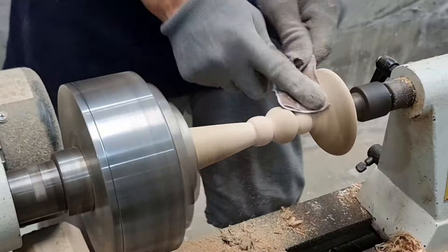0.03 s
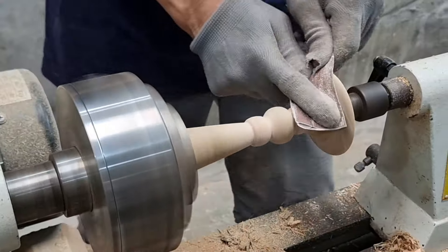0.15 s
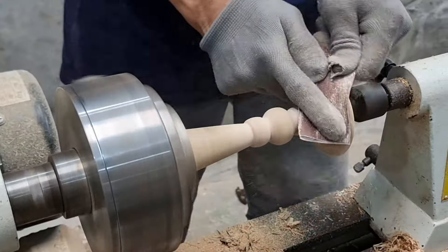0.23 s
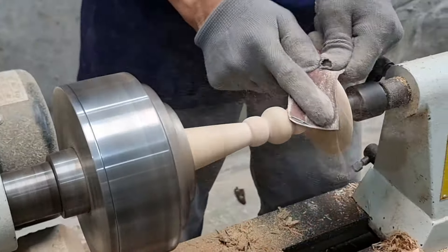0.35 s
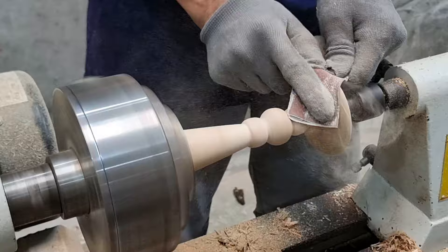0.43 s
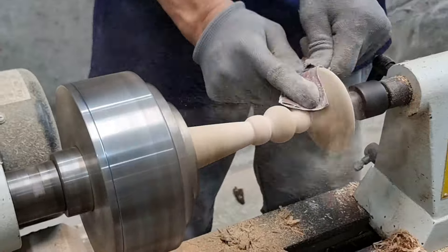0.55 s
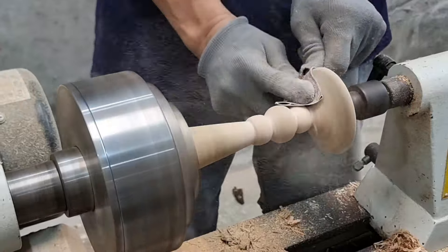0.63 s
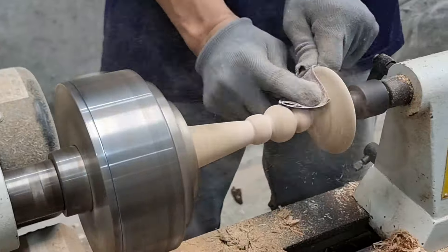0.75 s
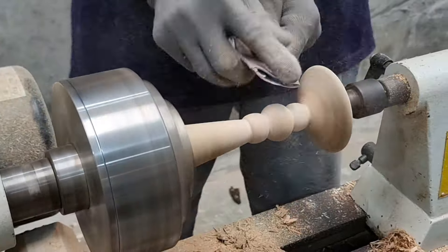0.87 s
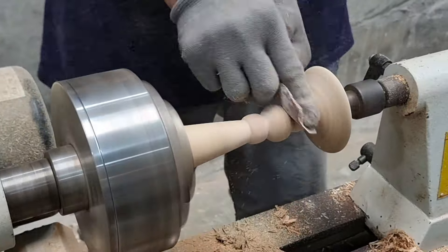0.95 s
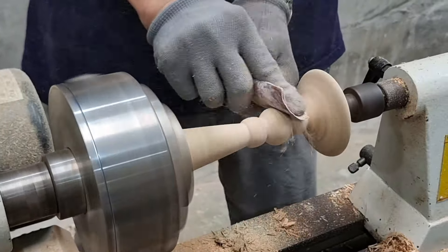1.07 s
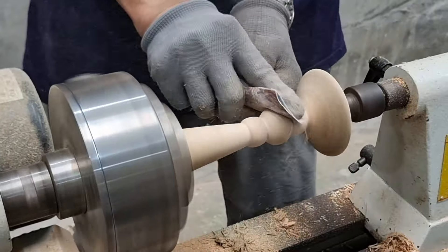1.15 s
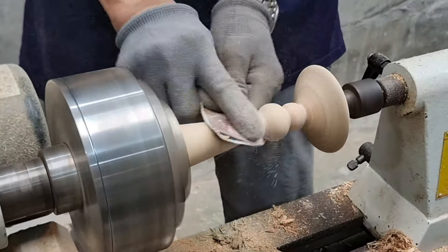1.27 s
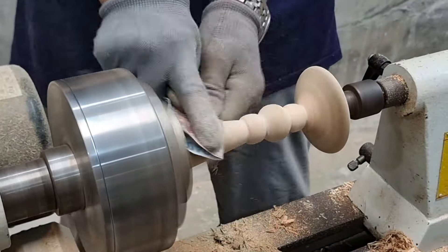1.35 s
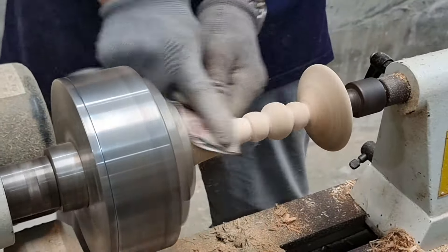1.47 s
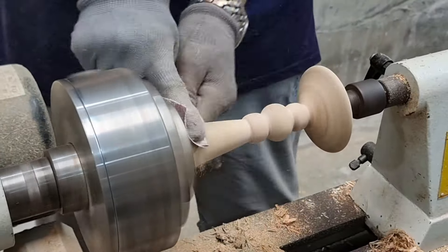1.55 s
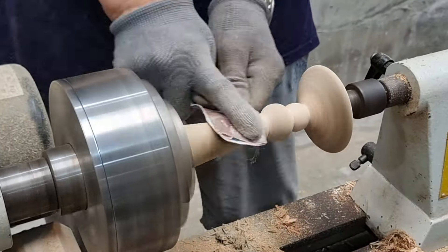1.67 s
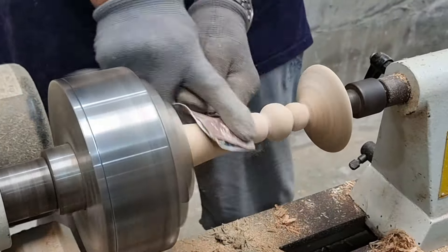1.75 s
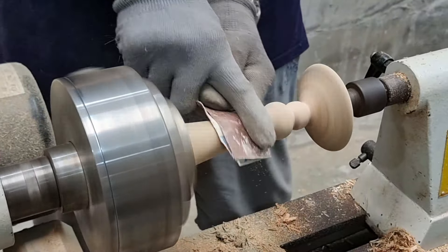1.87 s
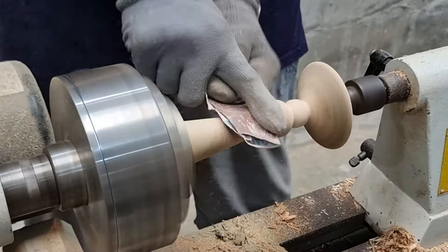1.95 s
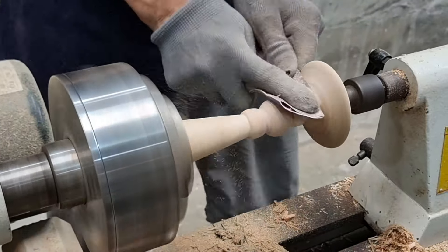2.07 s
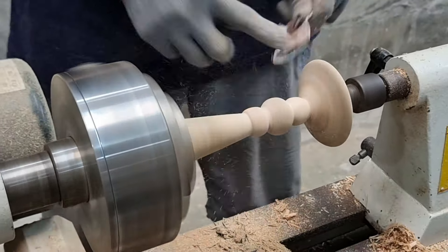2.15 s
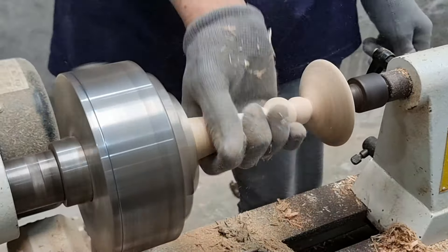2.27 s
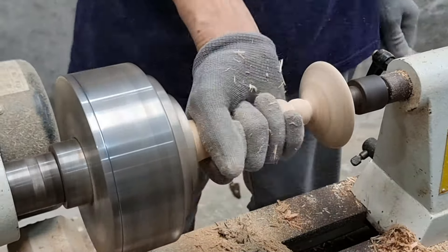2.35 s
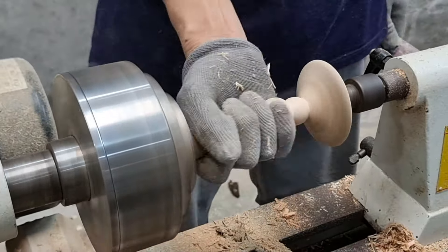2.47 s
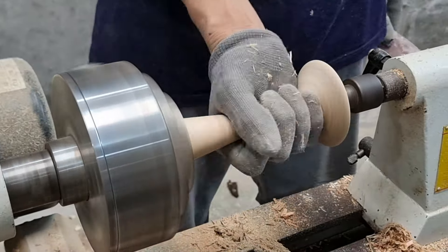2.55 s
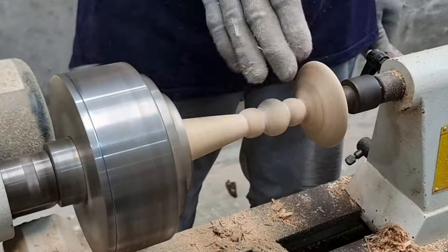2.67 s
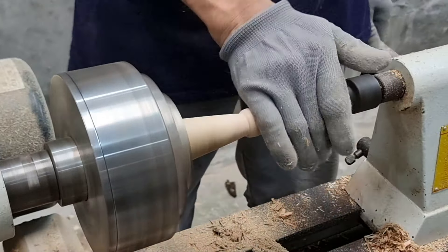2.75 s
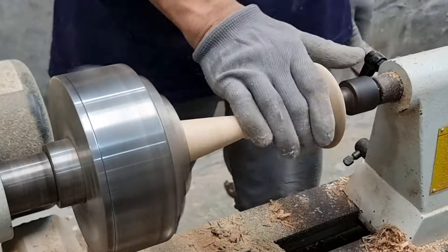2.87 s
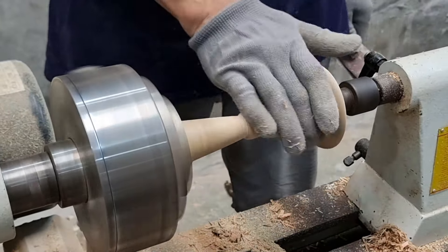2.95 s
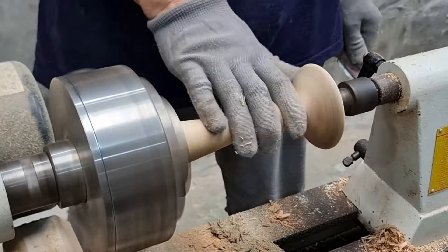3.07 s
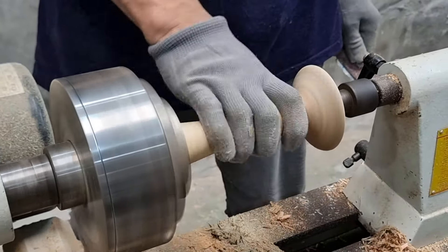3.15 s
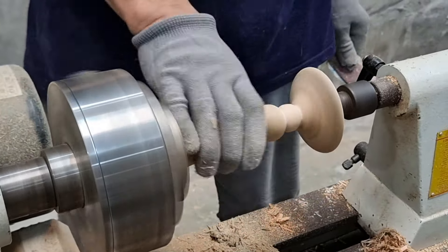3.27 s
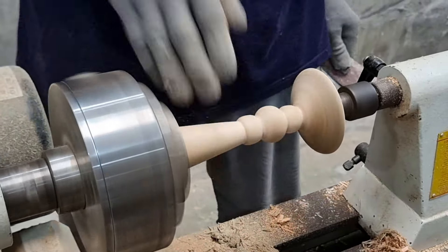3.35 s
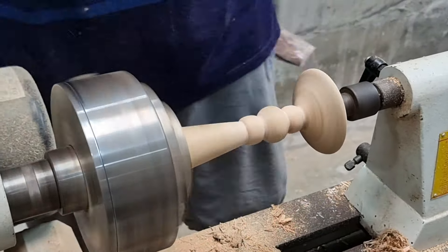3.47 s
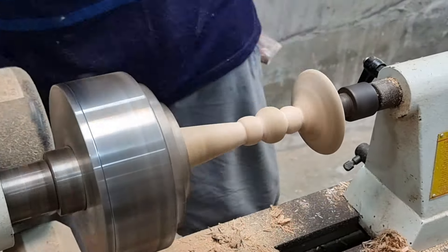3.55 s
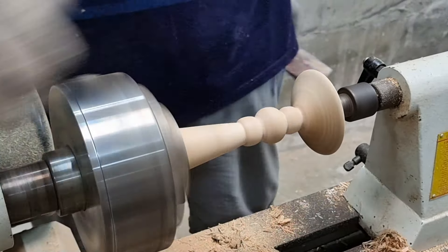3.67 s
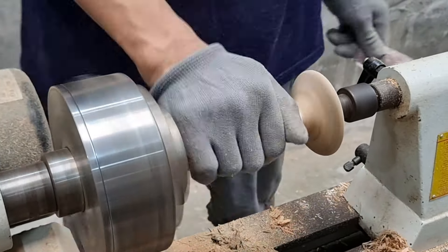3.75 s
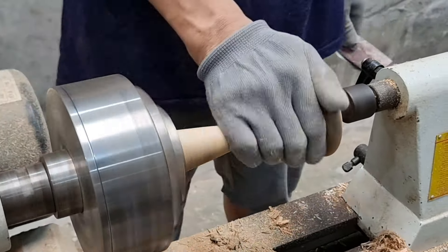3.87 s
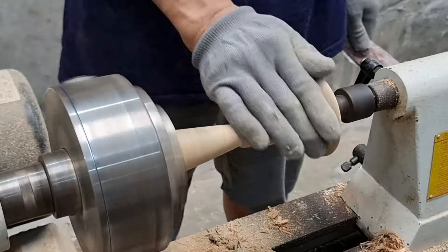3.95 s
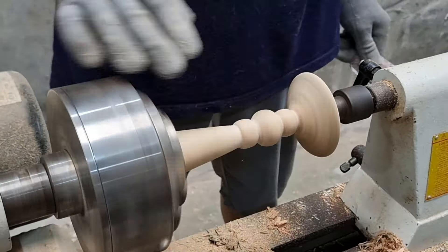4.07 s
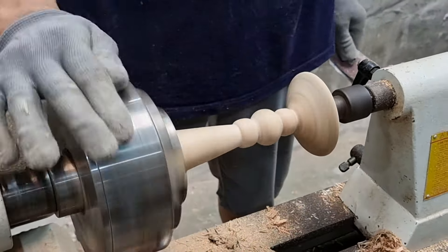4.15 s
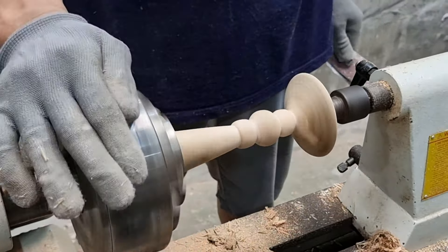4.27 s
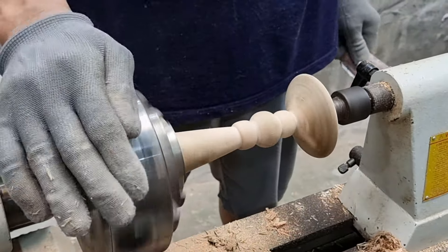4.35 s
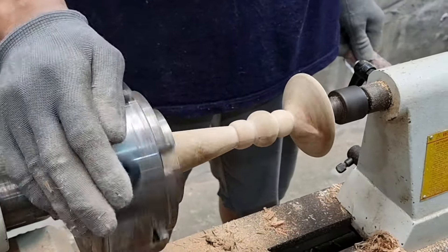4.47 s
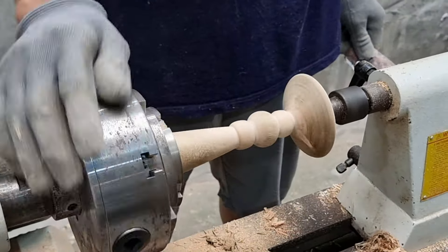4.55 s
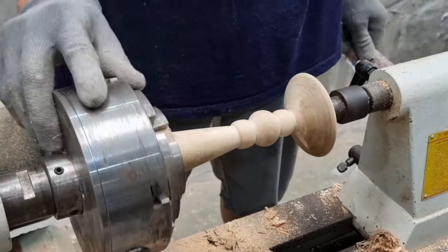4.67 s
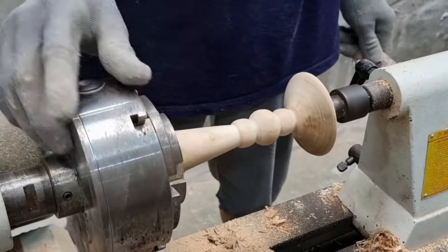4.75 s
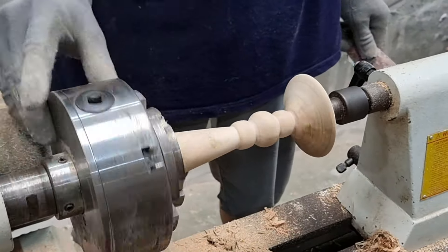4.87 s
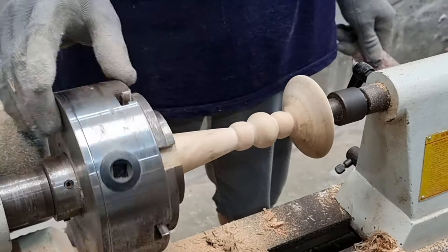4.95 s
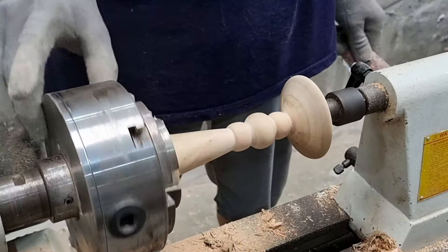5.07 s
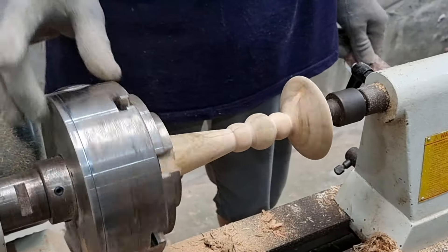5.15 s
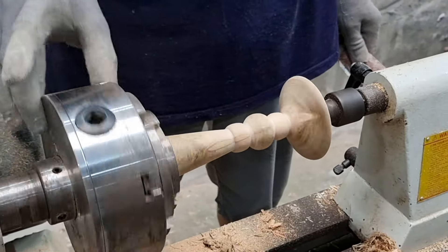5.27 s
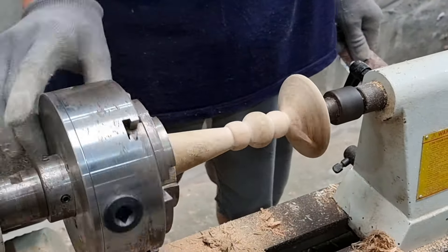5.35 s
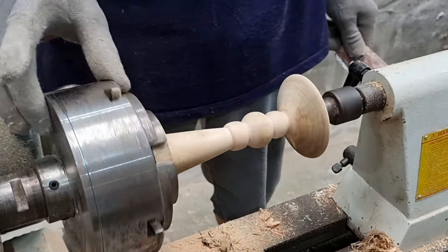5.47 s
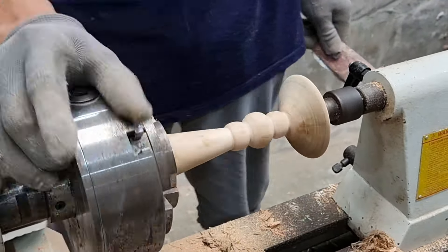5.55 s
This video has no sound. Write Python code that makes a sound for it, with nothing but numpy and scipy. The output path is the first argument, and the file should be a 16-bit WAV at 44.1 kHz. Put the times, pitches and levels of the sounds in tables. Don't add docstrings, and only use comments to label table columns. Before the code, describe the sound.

Sandpaper then a gloved hand rasps on a spinning wooden piece over a humming lathe, which clicks off and slows while cicadas shrill steadily outside.

```python
import sys
import numpy as np
from scipy import signal
from scipy.fft import rfft, irfft, next_fast_len
from scipy.io import wavfile
from scipy.ndimage import map_coordinates

SR = 44100
rng = np.random.default_rng(int(sys.argv[2]) if len(sys.argv) > 2 else 0)


def output_pcm(signal):
    pcm = np.clip(np.atleast_2d(signal).T, -1, 1) * 32767
    wavfile.write(sys.argv[1], SR, np.round(pcm).astype(np.int16))


def to_linear_factor(level_db):
    exponent = np.asarray(level_db, float) / 20
    return 10 ** exponent


N = 247842


def seconds():
    return np.arange(N) / SR


def unit(x):
    return x / np.sqrt(np.mean(x ** 2) + 1e-20)


def along(points, hz):
    f, v = np.transpose(points)
    return np.interp(np.log(hz + 1), np.log(f + 1), v)


def curves(rows):
    s, *cols = np.transpose(rows)
    return [np.interp(seconds(), s, c) for c in cols]


def wobble(rate):
    knots = rng.standard_normal(int(N * rate / SR) + 4)
    return map_coordinates(knots, [np.arange(N) * rate / SR])


def filtered(x, response):
    m = next_fast_len(N + SR // 4)
    return irfft(rfft(x, m) * response(np.fft.rfftfreq(m, 1 / SR)), m)[..., :N]


def modes(table):
    def response(f):
        total = 0
        for k, (hz, width, db) in enumerate(table):
            total = total + (-1) ** k * to_linear_factor(db) * 1j * f * width / (hz * hz - f * f + 1j * f * width)
        return total
    return response


def shape(points):
    return lambda f: to_linear_factor(along(points, f)) * (f > points[0][0]) * (f < points[-1][0])


# frequency in Hz, left-right correlation 0..1.
PORT_LIKENESS = [(60, 0.71), (180, 0.84), (300, 0.32), (550, 0.22), (1200, 0.053)]


def rush(response, grain_db=0, grain_rate=100):
    pair = rng.standard_normal((2, N)) * to_linear_factor(grain_db * wobble(grain_rate))

    def mid_side(hz):
        turn = np.arccos(np.clip(along(PORT_LIKENESS, hz), -1, 1)) / 2
        return response(hz) * [np.cos(turn), np.sin(turn)]

    mid, side = filtered(pair, mid_side)
    return unit(np.array([mid + side, mid - side]))


def tone(hz, blur_rad, lead_rad):
    phase = 2 * np.pi * np.cumsum(hz) / SR + blur_rad * wobble(30)
    apart = lead_rad + 0.16 * wobble(4.95)
    return np.sqrt(2) * np.sin([phase + apart, phase - apart])


def strokes(rows, rise_s, fall_s):
    t, out = seconds(), np.zeros(N)
    for s, length, start_db, end_db in rows:
        rise, fall = (t - s) / rise_s + .5, (s + length - t) / fall_s + 1
        edge = np.clip(np.minimum(rise, fall), 0, 1)
        out = np.maximum(out, edge * to_linear_factor(np.interp(t, [s, s + length], [start_db, end_db])))
    return out


def bumps(times, levels_db, half_s):
    t = seconds()
    return sum(to_linear_factor(db - 13.0 * ((t - s) / half_s) ** 2) for s, db in zip(times, levels_db))


# frequency in Hz, level in dB per Hz.
AIR_SPECTRUM = [(25, -9), (45, -7), (110, -6), (150, -9.5), (240, -16.5), (500, -18.5), (850, -28),
                (3900, -28.5), (8300, -32), (10500, -35), (15900, -42)]


def air():
    breeze = to_linear_factor(2.5 * wobble(6))
    return to_linear_factor(-59) * breeze * rush(shape(AIR_SPECTRUM))


# spectrum as (Hz, dB per Hz) points, level in dB, throb depth in dB.
CHORUSES = [
    ([(2290, -58), (3900, -33), (4520, -5.5), (4840, -4.5), (5130, -7), (5310, -34), (5600, -26), (7280, -62), (12300, -120)], -49, 3.3),
    ([(3290, -60), (5600, -22), (5630, -19), (6150, -9), (6390, -2), (6710, 2.5), (7430, 0.5), (8200, -38), (10700, -62), (18000, -120)], -48, 1.2),
    ([(12000, -24), (13000, -12), (13800, 1), (14800, -11), (15600, -28)], -67.5, 2.5),
]
THROB_HZ = [20.1, 37.5, 37.5]


def cicadas():
    t, out = seconds(), 0
    for (colour, db, throb_db), rate in zip(CHORUSES, THROB_HZ):
        depth = .7 + .25 * wobble(3)
        throb = depth * np.sin(2 * np.pi * rate * t + .8 * wobble(2.5))
        out = out + to_linear_factor(db + throb_db * throb) * rush(shape(colour), grain_db=-2.0, grain_rate=420)
    return out


# start in seconds, puff peak in dB, crack in dB re puff, thud in dB re puff, t60 in seconds.
KNOCKS = [
    (1.609, -32, -8, 5, .025),
    (2.514, -32, -23, -3, 0.023),
    (4.218, -32, -11, 8, 0.0083),
    (4.389, -35, -15, 2, 0.018),
    (4.487, -30, -21, -8, 0.032),
    (5.362, -42, -11, -11, 0.03),
]


def knocks():
    out, t = np.zeros((3, 2, N + SR)), np.arange(SR // 5) / SR
    for s, db, bright_db, thud_db, t60 in KNOCKS:
        envelope = to_linear_factor(-60 * t / max(t60, .003)) * (1 - np.exp(-t / 0.0023))
        burst = rng.standard_normal((3, 2, len(t))) * envelope
        levels = to_linear_factor(db + np.array([0, bright_db, thud_db]))[:, None, None]
        i = round(s * SR)
        out[:, :, i:i + len(t)] += burst * levels
    puff, crack, thud = out[:, :, :N]
    return (filtered(puff, shape([(500, -16), (900, 9), (3500, 0.0), (6000, 0), (9000, -39)]))
            + filtered(crack, shape([(5000, -18), (8000, -23.0), (16000, 2.0)]))
            + filtered(thud, shape([(60, 0), (300, 17.5), (600, 23)])))


# start in seconds, level in dB, half length in seconds, spectrum as (Hz, dB) points.
SWITCH_SNAP = (3.631, -28.5, .0018, [(600, -14), (1500, -12), (2500, -6), (3800, 2), (7500, -4),
               (9000, -15), (15500, -13)])


def switch():
    s, db, half, colour = SWITCH_SNAP
    return to_linear_factor(db) * np.exp(-((seconds() - s - half) / half) ** 2) * rush(shape(colour))


# start in seconds, frequency in Hz, peak in dB, t60 in seconds.
PALM_THUMPS = [
    (4.101, 92, -40, 0.42),
    (4.212, 93.5, -36, 0.19),
    (4.2, 144, -31.5, 0.12),
    (4.351, 148.7, -39.5, 0.3),
    (4.41, 146, -39, .1),
    (4.67, 120, -41, 0.12),
    (5.44, 71.4, -50, 0.7),
]
# centre in seconds, half length in seconds, centre frequency in Hz, level in dB.
DRAGS = [(2.725, 0.0043, 4500, -38), (3.632, 0.006, 3340, -30.5), (3.62, .014, 12500, -61),
         (4.222, 0.001, 4700, -40), (4.342, 0.0053, 2900, -40.5), (4.381, 0.025, 1300, -43.5),
         (4.446, 0.013, 1280, -48.5), (4.544, 0.027, 1000, -53.5), (4.59, 0.031, 450, -63),
         (5.455, 0.033, 598.6, -53.5), (5.589, 0.035, 1000, -53)]


def palm():
    t, out = seconds(), np.zeros((2, N))
    for s, hz, db, t60 in PALM_THUMPS:
        u = np.maximum(t - s, 0)
        out += to_linear_factor(db - 60 * u / t60) * (1 - np.exp(-u / 0.014)) * np.sin(2 * np.pi * hz * u)
    for s, half, hz, db in DRAGS:
        resonance = modes([(hz, .9 * hz, 0)])
        drag = rush(lambda f: resonance(f) ** 2, grain_db=4, grain_rate=250)
        out += to_linear_factor(db) * np.exp(-((t - s) / half) ** 2) * drag
    return out


def contact(rows):
    hiss = strokes([row[:4] for row in rows], rise_s=0.033, fall_s=0.021)
    rasp = strokes([(s, length, db, db) for s, length, *_, db in rows], rise_s=0.042, fall_s=0.042)
    return hiss, rasp


# start in seconds, length in seconds, hiss in dB at start, at end, rasp in dB.
GLOVE_STROKES = [(2.36, 0.19, -58.5, -58, -49), (2.57, 0.2, -57, -64, -52), (2.83, 0.37, -59.5, -58, -51.5),
                 (3.11, 0.3, -57.5, -64, -51.5), (3.37, 0.095, -58, -63, -47),
                 (3.56, 0.062, -77, -65, -46.5), (3.66, 0.14, -84, -85, -53), (3.86, 0.27, -63, -59.5, -53),
                 (4.15, 0.022, -75, -78, -54), (4.22, 0.317, -63, -61.5, -62), (4.56, 0.16, -66, -68, -84),
                 (4.77, 0.034, -79, -79, -70), (4.92, 0.022, -76, -76, -80), (5.17, .02, -71, -73, -66),
                 (5.25, 0.019, -72, -71.5, -54), (5.415, 0.026, -66, -68, -62), (5.56, .07, -64, -77, -58)]
# centre in seconds, rasp in dB.
SQUEEZES = [
    (2.32, -44),
    (2.524, -46),
    (2.754, -45.5),
    (2.856, -49),
    (3.09, -45),
    (3.2, -52),
    (3.39, -44),
    (3.468, -51),
]
# frequency in Hz, level in dB per Hz.
GLOVE_HISS = [(4820, -43), (8200, -13), (9580, -13), (12500, 3.5), (14400, -4), (15900, -6)]


def glove(press):
    hiss, rasp = contact(GLOVE_STROKES)
    hiss = hiss * rush(shape(GLOVE_HISS), grain_db=0.8, grain_rate=250)
    dull = [(500, -15.5), (1500, -10), (2300, -2.5), (3200, -1.5), (4200, -6.0), (5800, -10.5), (8000, -21)]
    rasp = press * rasp + bumps(*np.transpose(SQUEEZES), half_s=0.039)
    return to_linear_factor(3.0) * hiss + to_linear_factor(2.5) * rasp * rush(shape(dull), grain_db=2.5, grain_rate=120)


# start in seconds, length in seconds, hiss in dB at start, at end, rasp in dB.
PAPER_STROKES = [(-.03, 0.14, -34, -41, -38), (.14, 0.11, -37, -31.5, -43),
                 (.225, 0.3, -31.5, -32.5, -40.5), (.525, 0.23, -30, -39, -41.5),
                 (.735, 0.14, -37.5, -36, -42.5), (.86, 0.099, -33, -35.5, -42),
                 (.97, 0.07, -68, -65, -41.5), (1.035, 0.13, -46, -41.5, -39),
                 (1.135, 0.18, -45, -41.5, -41.5), (1.275, 0.34, -41, -37, -38),
                 (1.612, .36, -38.5, -41.5, -39.5), (1.97, 0.21, -38.5, -44, -38),
                 (2.18, 0.075, -40, -42, -39)]
# centre in seconds, hiss in dB, rasp in dB.
PAPER_BITES = [
    (.53, -56, -37),
    (1.045, -55, -45),
    (1.08, -64, -38.5),
    (1.611, -41, -34.5),
    (1.676, -37.5, -33),
    (1.985, -54, -61),
]
# frequency in Hz, level in dB per Hz.
GRIT_HISS = [(2500, -9), (3900, -0.5), (5500, -3), (7180, -5.5), (8170, -9), (9850, -9), (10900, -7),
             (12900, -1), (14400, -5), (15900, -8)]
# frequency in Hz, level in dB per Hz.
WOOD_RASP = [(1500, -40), (2400, -1.5), (3200, 2), (4300, -0.5), (5000, 1), (5600, -9), (7300, -8.5),
             (8200, -33), (11000, -70)]


def sandpaper(press):
    hiss, rasp = contact(PAPER_STROKES)
    s, hiss_db, rasp_db = np.transpose(PAPER_BITES)
    hiss = hiss + bumps(s, hiss_db, half_s=0.018)
    rasp = press * rasp + bumps(s, rasp_db, half_s=0.018)
    fine = hiss * rush(shape(GRIT_HISS), grain_db=0.8, grain_rate=340)
    coarse = rasp * rush(shape(WOOD_RASP), grain_db=2.0, grain_rate=130)
    return to_linear_factor(3.0) * fine + to_linear_factor(1.0) * coarse


def rubbing():
    press, grip = to_linear_factor(.9 * wobble(14)), to_linear_factor(.45 * wobble(23))
    return grip * (sandpaper(press) + glove(press))


# time in seconds, share of full speed.
SPINDLE_SPEED = [(0, 1), (3.64, 0.97), (3.68, 0.88), (4.07, 0.71), (4.2, 0.63), (4.44, 0.47), (4.54, 0.31),
                 (4.62, 0.19), (4.75, .03)]


def spindle_speed():
    return curves(SPINDLE_SPEED)[0]


# frequency in Hz, level in dB per Hz.
BEARING_SPECTRUM = [(1800, -36), (2800, -6), (4000, 5.5), (5600, -0.5), (7400, -10), (8000, -38)]


def bearing(speed):
    gain = to_linear_factor(-49.5 + 1.5 * wobble(9)) * speed ** 2.5
    return gain * rush(shape(BEARING_SPECTRUM), grain_db=1.0, grain_rate=230)


# centre in seconds, level in dB.
BELT_JOLTS = [(.005, -45), (.25, -43.5), (.51, -38.5), (.78, -45), (.855, -37), (.885, -45), (1.04, -40),
              (1.09, -44), (1.54, -42), (1.875, -39), (1.911, -39.5), (2.09, -52), (2.2, -43), (2.52, -43),
              (2.75, -53), (2.82, -43), (2.99, -36.5), (3.57, -39), (3.629, -39), (4.23, -61)]
# frequency in Hz, level in dB.
JOLT_MODES = [(259, 1.5), (343, 3)]
# start in seconds, length in seconds, rumble in dB, rattle in dB.
HAND_TURNS = [
    (5.242, 0.023, -60, -51),
    (5.418, .04, -56, -65),
    (5.557, .07, -57.5, -63),
]
# frequency in Hz, width in Hz, level in dB.
PANEL_MODES = [(265.3, 31.5, -4.5), (301, 38.5, 1), (334, 39, -1), (382, 24, -18.5), (524, 34, -13.5)]
# frequency in Hz, level in dB per Hz.
RUMBLE_SPECTRUM = [(34, -21), (45, -9), (60, -8), (92, -7), (147, -11), (212, -1.5), (300, 1), (423, -2.5),
                   (520, -12.5), (611, -15), (796, -15), (1200, -18.5), (1560, -24)]
# frequency in Hz, width in Hz, level in dB.
WHIR_MODES = [(413.5, 6.7, 1.5), (516.7, 8, -7), (672.5, 58, -13.5), (790.2, 10.3, -6.5)]
# frequency in Hz, width in Hz, level in dB.
HOUSING_MODES = [(1000, 290, -4), (1143, 20, 1.5), (1367, 140, -6), (1616, 21.6, 5.5), (1699, 66, 1.5),
                 (2076, 190, -3), (2443, 165, -4.5), (3307, 73, -5.5)]


def spindle():
    speed = spindle_speed()
    jolts = bumps(*np.transpose(BELT_JOLTS), half_s=0.013)
    s, length, low_db, high_db = np.transpose(HAND_TURNS)
    low, high = (strokes(list(zip(s, length, db, db)), 0.033, 0.057) for db in (low_db, high_db))
    rumble = to_linear_factor(-38) * speed ** 2.02 + jolts + low
    rattle = to_linear_factor(-39 + 1.02 * wobble(11)) * speed ** 3.3 + high
    panels = speed ** 0.49 * to_linear_factor(1.0) * rush(modes(PANEL_MODES), grain_db=1.5, grain_rate=60)
    panels = panels + rush(shape(RUMBLE_SPECTRUM), grain_db=-1.0, grain_rate=66)
    whir = speed ** 4.8 * to_linear_factor(-4.0) * rush(modes(WHIR_MODES))
    housing = rush(modes(HOUSING_MODES), grain_db=1.0, grain_rate=150)
    lumps = to_linear_factor(0.2 * wobble(24))
    ring = sum(to_linear_factor(db) * tone(np.full(N, hz), blur_rad=0.25, lead_rad=0.065) for hz, db in JOLT_MODES)
    return bearing(speed) + jolts * ring + lumps * (rumble * (panels + whir) + rattle * housing)


OFF_S = 3.67

# centre in seconds, low mode in dB, high mode in dB.
BED_NUDGES = [
    (3.745, -39, -31),
    (3.861, -33, -31),
    (3.97, -45, -41),
    (4.022, -47, -32.5),
    (4.06, -54, -42),
    (4.19, -50, -42),
    (4.28, -43, -42.5),
    (4.346, -49, -47),
    (4.415, -69, -58),
    (4.492, -50, -58),
]


def coast():
    free = np.clip((seconds() - OFF_S) / .03 + 1, 0, 1) * to_linear_factor(-36.5) * spindle_speed() ** 4
    s, low_db, high_db = np.transpose(BED_NUDGES)
    low, high = (free * to_linear_factor(4.6 * wobble(22.07)) + bumps(s, db, half_s=0.014) for db in (low_db, high_db))
    low_mode = tone(252 + 6 * wobble(8), blur_rad=0.36, lead_rad=.06)
    high_mode = tone(308 + 7 * wobble(5.5), blur_rad=0.51, lead_rad=.06)
    return low * to_linear_factor(-2.0) * low_mode + high * to_linear_factor(-3.3) * high_mode


# start in seconds, length in seconds, level in dB at start, at end.
BED_SWELLS = [(-.01, 0.024, -38.5, -19.5), (.085, 0.066, -33, -27), (.185, 0.24, -21, -29.5),
              (.465, 0.16, -23.5, -25), (.6, .11, -21.5, -21), (.725, 0.17, -21.5, -26),
              (.865, 0.18, -34, -26), (1.085, .17, -21.5, -21.5), (1.28, 0.07, -27, -23),
              (1.385, 0.095, -26, -30), (1.51, 0.086, -18, -27.5), (1.605, 0.024, -19, -22),
              (1.655, 0.055, -21, -28), (1.9, 0.068, -32.5, -25.5), (1.975, 0.25, -23, -24.5),
              (2.26, 0.082, -23, -29), (2.36, 0.079, -30.5, -25), (2.46, 0.048, -25, -30),
              (2.51, 0.21, -21, -28), (2.76, 0.2, -34.5, -24.5), (2.965, .15, -23.5, -25.5),
              (3.2, .045, -25.5, -34), (3.28, 0.075, -32.5, -26.5), (3.41, 0.06, -24.5, -34),
              (3.495, 0.089, -23.5, -25.5), (3.612, 0.055, -24, -36)]


def bed():
    turn = 2 * np.pi * 24 * seconds() + 1.1 * wobble(3.8)
    flutter = 1 + .14 * wobble(4) * np.sin(turn)
    gain = strokes(BED_SWELLS, rise_s=0.01, fall_s=0.025) * to_linear_factor(-2.0 + 0.91 * wobble(35.24))
    return gain * flutter * tone(297 + 2.66 * wobble(11), blur_rad=0.35, lead_rad=0.094)


# time in seconds, frequency in Hz.
HUM_PITCH = [(0, 100), (3.6, 100), (3.75, 91)]


def hum():
    dies_db = 330 * np.maximum(seconds() - OFF_S, 0)
    hum_db = -40.5 + 2.86 * wobble(5.94) - dies_db
    return to_linear_factor(hum_db - 1.5) * tone(curves(HUM_PITCH)[0], blur_rad=0.12, lead_rad=0.14)


def motor():
    return bed() + coast() + hum()


def scene():
    return air() + cicadas() + knocks() + switch() + palm() + rubbing() + spindle() + motor()


def top_cut(x):
    return signal.sosfilt(signal.butter(12, 15900, fs=SR, output="sos"), x)


# frequency in Hz, left over right in dB.
PORT_COLOUR = [(60, 1), (92, -4.5), (140, 4.5), (210, -2), (330, -0.5), (500, 1.5), (770, -1), (1170, 0),
               (1790, -0.5), (2740, 2), (4190, -4), (6410, -2), (9810, 2), (15000, -8)]


def record(dry):
    side = np.array([[.5], [-.5]])
    lead_s, top_hz = 0.00015, 15820

    def port(hz):
        colour = to_linear_factor(along(PORT_COLOUR, hz) * side)
        return colour * np.exp(2j * np.pi * hz * lead_s * side) * (hz < top_hz)

    return top_cut(filtered(dry, port))


dry = scene()
out = record(dry)
output_pcm(out)
```